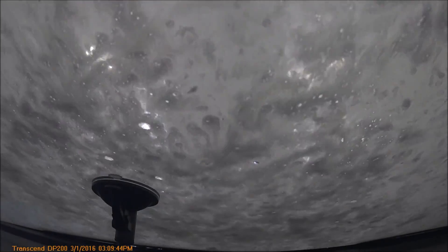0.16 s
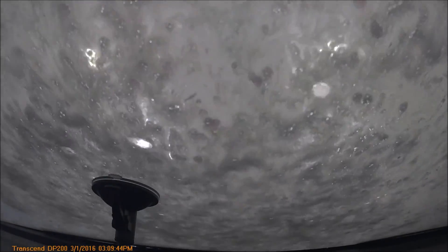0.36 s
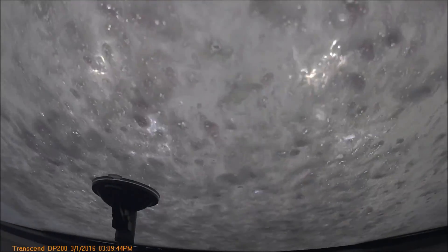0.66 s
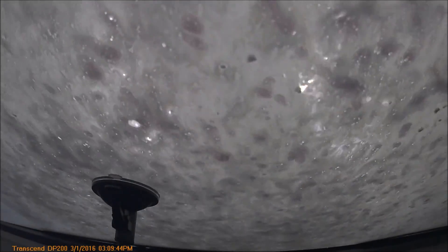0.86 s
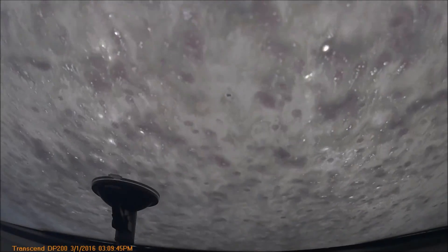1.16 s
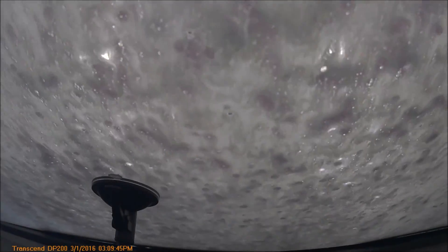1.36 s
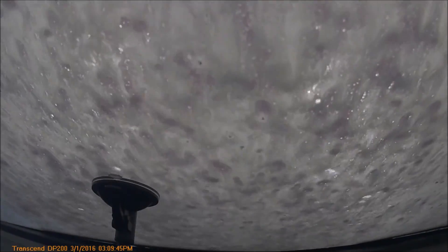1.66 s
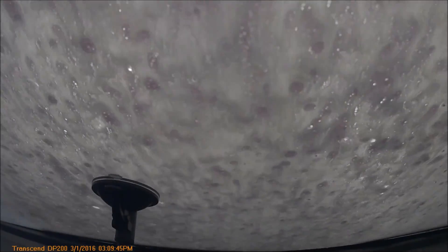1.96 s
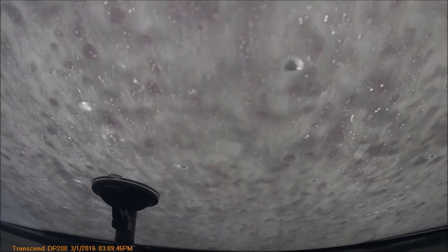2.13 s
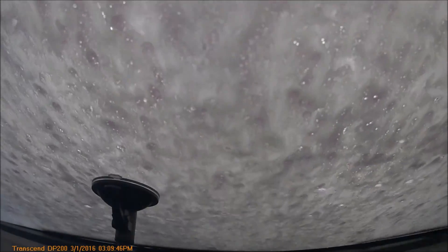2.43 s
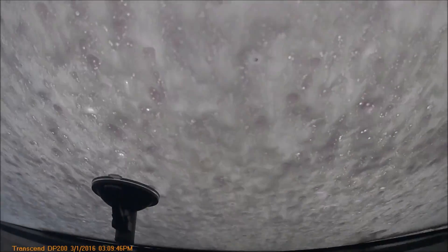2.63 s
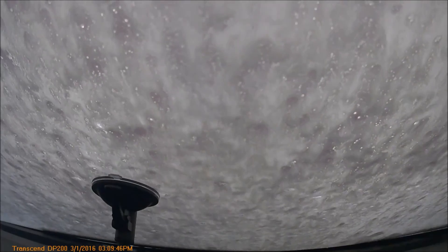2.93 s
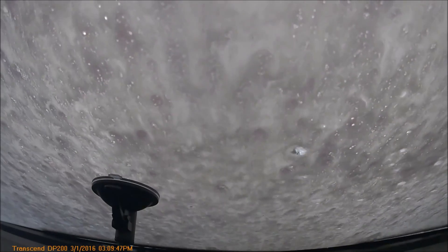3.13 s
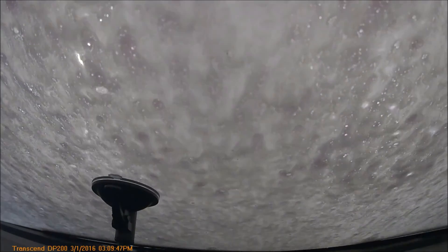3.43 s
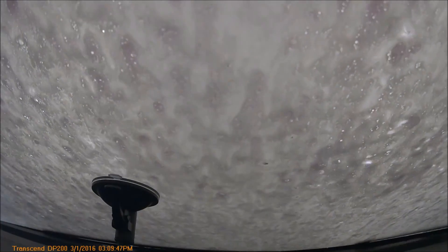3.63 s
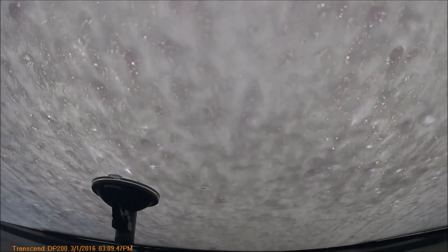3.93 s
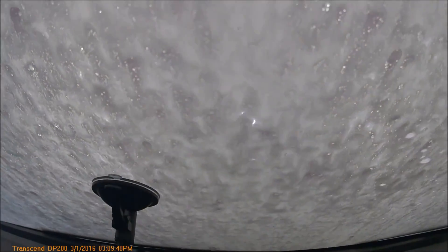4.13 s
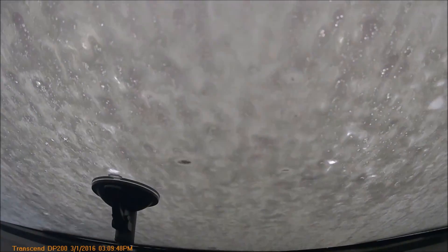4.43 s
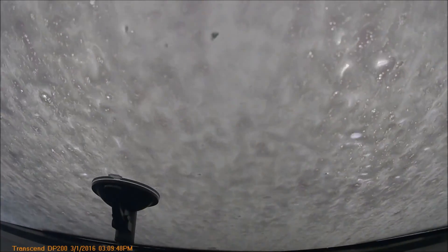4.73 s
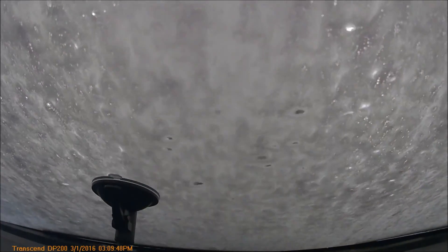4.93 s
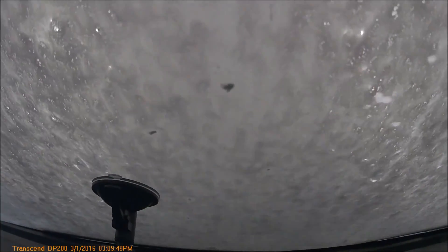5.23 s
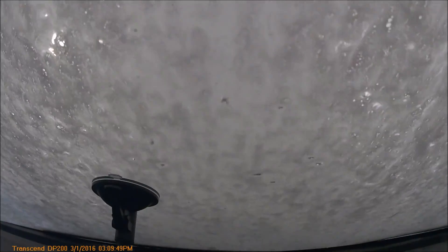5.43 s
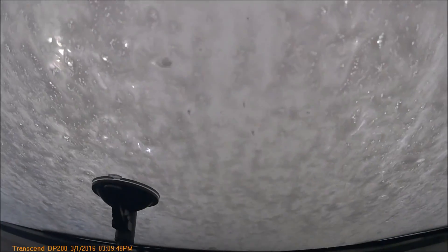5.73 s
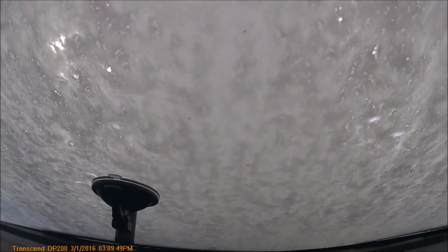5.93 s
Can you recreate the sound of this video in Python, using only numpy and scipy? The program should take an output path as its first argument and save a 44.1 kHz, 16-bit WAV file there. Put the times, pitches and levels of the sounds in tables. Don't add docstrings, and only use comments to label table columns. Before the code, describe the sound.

Heard inside a car in a tunnel wash: fine spray hisses and pumps rumble low while drops patter. A turning brush approaches, its strips slapping in quick clusters about eight a second. Midway it reaches the windshield, with hard hollow slaps, ragged water bursts and whip-like cracks until the end. The small camera microphone is thin and overloads.

```python
import sys
import numpy as np
from scipy import signal
from scipy.fft import rfft, irfft, next_fast_len
from scipy.io import wavfile
from scipy.ndimage import uniform_filter1d, map_coordinates

SR = 44100
rng = np.random.default_rng(int(sys.argv[2]) if len(sys.argv) > 2 else 0)


def persist_wave(psi):
    counts = np.round(np.clip(psi, -1, 1) * 32767).astype(np.int16)
    wavfile.write(sys.argv[1], SR, np.atleast_2d(counts).T)


def voltage_ratio(level):
    return 10 ** (np.asarray(level, float) / 20)


N = 268569

# (time [s], spray level [dB], machinery level [dB])
TUNNEL_LEVELS = [(0, -63.5, -37.5), (.5, -62, -39.5), (1, -65, -39), (2, -67, -41.5), (3.2, -67, -39),
                 (6.09, -66.5, -41.5)]
# (frequency [Hz], density [dB per Hz])
SPRAY_COLOUR = [(200, 6.5), (900, 13), (1100, 10), (2000, -9), (3200, 12.5), (3900, 2.5), (4700, 9),
                (5300, -6.5), (6200, 1), (8500, -7.5), (11200, -3)]
# (frequency [Hz], density [dB per Hz])
MACHINE_COLOUR = [(20, -11.5), (60, -4), (110, 1), (160, 4), (200, -2.5), (350, -13.5), (800, -38)]
# (time [s], drumming level [dB], spatter level [dB])
WASH_LEVELS = [(0.0, -29.5, -41.5), (2.29, -21.5, -60), (4.41, -15, -42), (6.09, -20, -47.5)]
# (frequency [Hz], width [Hz], level [dB])
MOUNT_MODES = [(359, 243, -10.5), (578.3, 69.8, 1), (818.3, 48.4, -10)]
# (frequency [Hz], density [dB per Hz])
SPLASH_COLOUR = [(900, 9), (1400, -2.5), (1680, 1.5), (2100, 0), (3200, 2), (4100, -12), (6000, -11.5),
                 (12000, -57)]
# (time [s], slap level [dB], splash level [dB])
EARLY_STRIPS = [(0.245, -20, -52), (0.308, -18.5, -61), (0.52, -15.5, -46), (0.763, -23, -56),
                (1.038, -13.5, -51), (1.256, -20.5, -64), (1.362, -22.5, -55.5), (1.401, -14, -54),
                (1.518, -17.5, -58), (1.706, -13.5, -35.5), (1.851, -16, -49.5), (1.885, -10, -43),
                (2.056, -10.5, -39.5), (2.107, -16.5, -48), (2.221, -31, -30), (2.251, -9.5, -62),
                (2.335, -8, -35), (2.453, -9.5, -35), (2.556, -10, -30), (2.689, -59, -39.5),
                (2.83, -19.5, -31), (2.925, -16, -39.5), (2.982, -17.5, -39), (3.062, -12, -29)]
# (start [s], length [s], slap level [dB], splash level [dB])
STRIP_ROWS = [(2.555, 0.033, -13.5, -36.5), (2.67, 0.073, -9.5, -37), (2.78, 0.076, -11.5, -38.5),
              (2.895, 0.046, -8, -41.5), (2.975, .03, -10.5, -34), (3.025, 0.11, -14.5, -37.5),
              (3.145, 0.061, -10, -30.5), (3.28, 0.064, -11, -38), (3.395, 0.04, -4.5, -22),
              (3.51, 0.1, -10.5, -37), (3.635, 0.058, -9, -30), (3.73, 0.1, -8.5, -31),
              (3.9, 0.056, -8, -28.5), (4.015, 0.055, -8.5, -30.5), (4.14, 0.048, -7, -21.5),
              (4.235, 0.084, -5.5, -24.5), (4.36, 0.047, -10, -25.5), (4.445, 0.13, -7, -31),
              (4.605, 0.079, -7, -23.5), (4.725, 0.058, -2.5, -24), (4.85, 0.088, -2.5, -25),
              (4.99, .07, -10.5, -27), (5.11, 0.094, -11.5, -33.5), (5.22, 0.087, -8, -25.5),
              (5.36, 0.078, -9, -26.5), (5.475, 0.056, -11, -25.5), (5.63, 0.047, -7.5, -28.5),
              (5.74, .065, -22.5, -29), (5.855, 0.06, -5.5, -30.5), (5.965, 0.09, -11, -28.5)]
# (time [s], slap level [dB], splash level [dB])
STRAY_STRIPS = [(2.897, -9.5, -35), (3.175, -7.5, -22), (3.256, -9.5, -45.5), (3.329, -14, -29),
                (3.394, -6.5, -32.5), (3.455, 0, -22), (3.877, -15.5, -30.5), (3.942, -6, -30),
                (4.068, -8, -22), (4.236, -8.5, -32.5), (4.389, -12, -27), (4.446, -11, -19),
                (4.509, -8.5, -26.5), (4.691, 0.5, -33), (4.724, -27, -25.5), (4.99, -13.5, -31),
                (5.038, 0, -18.5), (5.106, -8, -20), (5.259, 1, -23.5), (5.375, -2, -18.5),
                (5.489, -5.5, -25), (5.536, -3, -25.5), (5.596, -16, -20.5), (5.663, -13, -20),
                (5.712, -22.5, -24), (5.863, -14.5, -36.5), (5.877, -4.5, -18.5), (5.947, -16, -28.5),
                (5.976, -3, -19), (6.08, -23.5, -25.5)]
# (time [s], crack level [dB], slap level [dB], splash level [dB])
HARD_STRIPS = [(3.1864, -35.5, -19.5, -31.5), (3.2895, -42, -11, -22), (3.4316, -26.5, -2, -21.5),
               (3.5161, -32, -1.5, -30), (3.5545, -24.5, -8.5, -17.5), (3.6573, -27.5, 2, -18.5),
               (3.7353, -33.5, -8, -37.5), (3.7693, -33, -2, -14.5), (3.8006, -19.5, -19.5, -21),
               (3.9059, -29, -9, -29.5), (3.912, -31.5, -0.5, -16.5), (4.0252, -27, 2.5, -12.5),
               (4.146, -26, 5.5, -18), (4.1728, -18.5, -2, -19.5), (4.1876, -39, -1.5, -23.5),
               (4.2906, -23, -7.5, -19), (4.5242, -23, 4.5, -12.5), (4.6121, -21.5, -4, -26.5),
               (4.6573, -19, 0, -15), (4.7523, -27.5, -10, -22), (4.8544, -34, -16, -23.5),
               (4.8896, -25, -10.5, -25.5), (4.9205, -20.5, -6.5, -12.5), (5.1899, -33.5, -5.5, -26.5),
               (5.3035, -38.5, -28.5, -22), (5.386, -25, -6, -25), (5.3995, -32, -16.5, -17),
               (5.7848, -47.5, 0.5, -23), (5.901, -27, -2, -24.5), (6.0303, -29, 1.5, -29)]
# (frequency [Hz], density [dB per Hz])
CRACK_COLOUR = [(2000, -25.5), (4000, 4), (6000, -2.5), (9000, -6), (12000, -6.5)]
TREBLE_GAPS = [.285, .37, .605, .695, .82, .885, .95, 1.375, 1.99, 2.099, 2.505, 2.631, 2.76, 4.7, 5.468]
# (frequency [Hz], gain [dB])
MIC_COLOUR = [(20, -40), (120, -30), (300, -10), (850, 3.5), (1000, -3), (3300, -10), (6500, -22),
              (8500, -27.5), (11300, -22), (12200, -29.5), (13200, -83)]
# (frequency [Hz], width [Hz])
MIC_NOTCHES = [(950, 337), (1300, 393), (2600, 550), (7790, 2500), (10010, 2500)]

AIR_HZ = 7200
SLAP_LAG_S, SPLASH_LAG_S, CRACK_LAG_S = 0.0053, 0.0029, 0.0017


def unit(x):
    return x / np.sqrt(np.mean(x ** 2) + 1e-20)


def along(points, hz):
    f, v = np.transpose(points)
    return np.interp(np.log(hz + 1), np.log(f + 1), v)


def curves(rows):
    s, *cols = np.transpose(rows)
    return [np.interp(np.arange(N) / SR, s, c) for c in cols]


def wobble(rate):
    knots = rng.standard_normal(int(N * rate / SR) + 4)
    return map_coordinates(knots, [np.arange(N) * rate / SR])


def filtered(x, response):
    m = next_fast_len(N + SR // 2)
    return irfft(rfft(x, m) * response(np.fft.rfftfreq(m, 1 / SR)), m)[..., :N]


def treble(x, corner_hz):
    return filtered(x, lambda hz: 1 - 1 / (1 + (hz / corner_hz) ** 8))


def noise(spectrum):
    return unit(filtered(rng.standard_normal(N), lambda hz: voltage_ratio(along(spectrum, hz))))


def patchy(x, depth_db):
    z = signal.stft(x, nperseg=256)[2]
    field = uniform_filter1d(rng.standard_normal(z.shape), size=5, axis=0)
    field = uniform_filter1d(field, size=3, axis=1)
    gain = voltage_ratio(2 * depth_db * np.tanh(unit(field) / 2))
    return unit(signal.istft(z * gain, nperseg=256)[1][:N])


def bursts(times, levels_db, lengths, rise, fall):
    env, t = np.zeros(N + SR), np.arange(-SR // 40, SR // 20) / SR
    for s, db, length in zip(times, levels_db, np.clip(lengths, .001, .02)):
        swell = np.exp(-(t / (rise * length)) ** 2)
        decay = np.exp(-(np.abs(t) / (fall * length)) ** 2.07)
        env[round(s * SR):][:len(t)] += voltage_ratio(db) * np.where(t < 0, swell, decay)
    return env[SR // 40 + 1:][:N]


def spray(spray_db):
    top_hz, gone_s, fade_s, loss_db = 11650, 1.85, .12, -4.5
    flutter_db = .8 * wobble(12) + 1.2 * wobble(150)
    hiss = filtered(noise(SPRAY_COLOUR), lambda hz: hz < top_hz)
    fizz_gain = voltage_ratio(9.0 + .8 * (spray_db - spray_db.max()))
    jets = hiss + (fizz_gain - 1) * treble(hiss, 5600)
    covered = 1 / (1 + np.exp((gone_s - np.arange(N) / SR) / fade_s))
    air = filtered(jets, lambda hz: hz > AIR_HZ)
    jets = jets + (voltage_ratio(loss_db * covered) - 1) * air
    return voltage_ratio(spray_db + 23.5 + flutter_db) * jets


def machinery(machine_db):
    throb_db = 1.2 * wobble(6)
    rumble = filtered(noise(MACHINE_COLOUR), lambda hz: hz < AIR_HZ)
    return voltage_ratio(machine_db + 15.5 + throb_db) * rumble


def far_rows():
    rate, last_s, length_s = 8.15, 2.435, 0.069
    before = np.arange(20) / rate
    slap_db = -19 - 8 * before
    splash_db = -47.5 - 16 * before
    return np.c_[last_s - before, length_s + 0 * before, slap_db, splash_db]


def strips():
    gap_s, jitter_s = .0125, 0.0061
    row_contact_s, contact_scatter, hard_contact_s = 0.0078, 0.55, 0.0085
    row_splash_s, single_splash_s = .0075, .0065
    scatter_db = 3.5

    def tip_db(db):
        return -62.5 + 2.83 * (db + 25.5)

    start, length, slap_db, splash_db = np.r_[STRIP_ROWS, far_rows()].T[..., None]
    chance = np.tanh(rng.standard_normal((len(start), 10, 4)))
    offset = gap_s * (np.arange(10) + .5) + jitter_s * chance[..., 0]
    edge_db = -6 * (2 * offset / length - 1) ** 4
    splash_db = splash_db + edge_db + scatter_db * chance[..., 1]
    slap_db = slap_db + edge_db + scatter_db * chance[..., 2]
    contact = row_contact_s * np.exp(contact_scatter * chance[..., 3])
    rows = [start + offset, slap_db, contact, splash_db, row_splash_s + 0 * offset, tip_db(splash_db)]

    s, crack, slap, splash = np.transpose(HARD_STRIPS)
    hard = [s, slap + 1, hard_contact_s + 0 * s, splash + 1, single_splash_s + 0 * s, crack - 25]

    early = EARLY_STRIPS + np.r_[0, -5, -3]
    stray = STRAY_STRIPS + np.r_[0, -2, -5.5]
    s, slap, splash = np.r_[early, stray].T
    single = [s, slap, hard_contact_s + 0 * s, splash, single_splash_s + 0 * s, tip_db(splash)]
    return [np.r_[a.ravel(), b, c] for a, b, c in zip(rows, hard, single)]


def turning(s, level_db, contact):
    busy = bursts(s, level_db, 2 * contact, rise=1.0, fall=0.27)
    return .35 + busy / (uniform_filter1d(busy, size=SR // 3) + .05)


def mount(f):
    modes = 0
    for k, (c, w, db) in enumerate(MOUNT_MODES):
        resonance = 1j * f * w / (c * c - f * f + 1j * f * w)
        modes = modes + (-1) ** k * voltage_ratio(db) * resonance * f / c
    return modes / (1 + 1j * f / 1500) ** 3


def brush(drum_db, s, level_db, contact):
    phase = 2 * np.pi * np.cumsum(578 + 45 * wobble(70)) / SR
    rub = noise([(250, -27.5), (400, -5), (680, -4.5), (820, 5.5), (1300, -43.5)])
    judder = np.sin(phase) + 0.81 * rub
    force_db = level_db + 10 + 8 * np.log10(0.0041 / contact)
    push = bursts(s - .0025, force_db, 0.88 * contact, rise=0.45, fall=0.28) * judder
    drops = rng.standard_normal(N) * voltage_ratio(3.33 * wobble(30))
    drumming = voltage_ratio(drum_db - 3.5) * unit(filtered(drops, mount))
    return filtered(push, mount) + drumming


def wet_glass(hz):
    sizzle = voltage_ratio(-6.5) * np.exp(-((hz - 3330) / 380) ** 2)
    return (1 + sizzle) / (1 + (hz / 4200) ** 4)


def water(spatter_db, s, level_db, lengths):
    thrown = bursts(s, level_db + 11.5, lengths, rise=0.48, fall=0.65)
    grains = patchy(noise(SPLASH_COLOUR), depth_db=3.0)
    treble_gain = (thrown / voltage_ratio(-14.5)) ** 0.45
    splash = thrown * (grains + (treble_gain - 1) * treble(grains, 4000))
    sheet_s, sheet_db = .013, -3
    runoff = np.exp(-np.arange(SR // 8) / (sheet_s * SR)) / (sheet_s * SR)
    running = signal.fftconvolve(thrown, runoff)[:N]
    bed = voltage_ratio(spatter_db + 5.5 + 2.5 * np.tanh(wobble(70))) + voltage_ratio(sheet_db) * running
    spatter = bed * filtered(patchy(noise(SPLASH_COLOUR), depth_db=7.5), wet_glass)
    flicker = voltage_ratio(4.5 * np.tanh(0.86 * wobble(400)))
    return flicker * (splash + spatter)


def cracks(s, level_db):
    snap = bursts(s, level_db + 40, np.full(len(s), .004), rise=0.38, fall=0.38)
    return snap * noise(CRACK_COLOUR)


def scene():
    spray_db, machine_db = curves(TUNNEL_LEVELS)
    drum_db, spatter_db = curves(WASH_LEVELS)
    s, slap_db, contact, splash_db, splash_s, crack_db = strips()
    reach = np.clip(np.arange(N) / SR / 2.6, 0, 1) ** 2
    busy_db = 20 * np.log10(turning(s + SLAP_LAG_S, slap_db, contact)) * reach
    tunnel = spray(spray_db) + machinery(machine_db)
    slaps = brush(drum_db + 0.12 * busy_db, s + SLAP_LAG_S, slap_db, contact)
    splashes = water(spatter_db + 0.69 * busy_db, s + SPLASH_LAG_S, splash_db, splash_s)
    return (tunnel + slaps + splashes + cracks(s + CRACK_LAG_S, crack_db))[None]


def overload(x):
    ceiling, hardness = 0.67, 8
    return x / (1 + np.abs(x / ceiling) ** hardness) ** (1 / hardness)


def microphone(f):
    notches = [(c * c - f * f) / (c * c - f * f + 1j * f * w) for c, w in MIC_NOTCHES]
    return voltage_ratio(along(MIC_COLOUR, f)) * np.prod(notches, axis=0)


def dropouts(x):
    gap_s, gap_db, gap_hz = .008, -11, 4000
    t = np.arange(N) / SR
    dip = sum(np.exp(-((t - s) / gap_s) ** 4) for s in TREBLE_GAPS)
    return x + (voltage_ratio(gap_db * dip) - 1) * filtered(x, lambda hz: hz > gap_hz)


def low_pass(x):
    return signal.sosfilt(signal.butter(12, 13280, fs=SR, output="sos"), x)


def record(dry):
    ending = np.clip((N - np.arange(N)) / 200, 0, 1)
    heard = filtered(overload(dry) * ending, microphone)
    return low_pass(dropouts(heard))


dry = scene()
out = record(dry)
persist_wave(out)
```